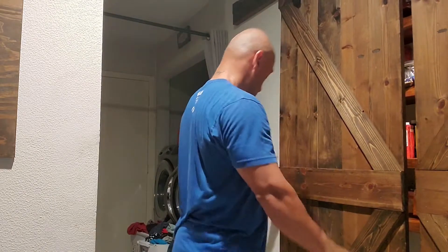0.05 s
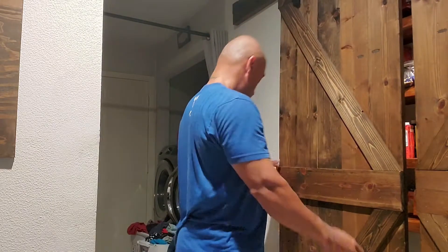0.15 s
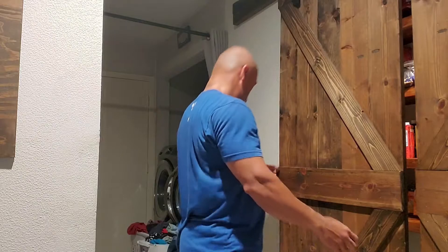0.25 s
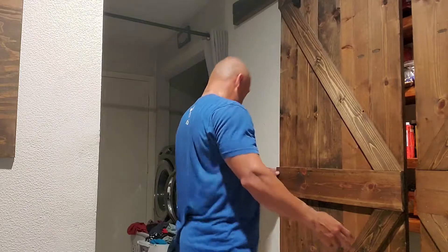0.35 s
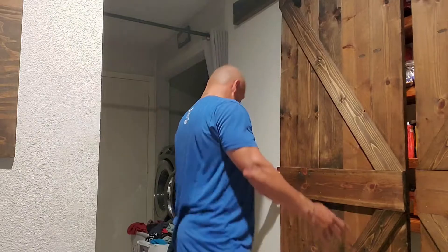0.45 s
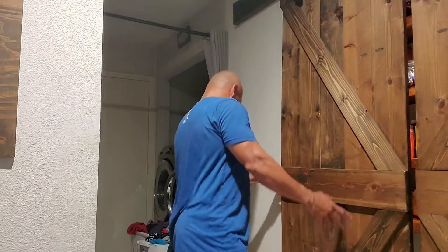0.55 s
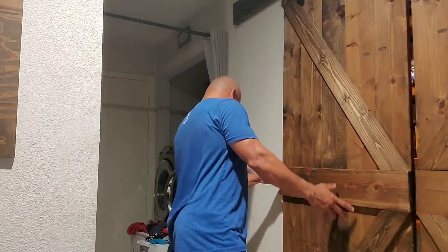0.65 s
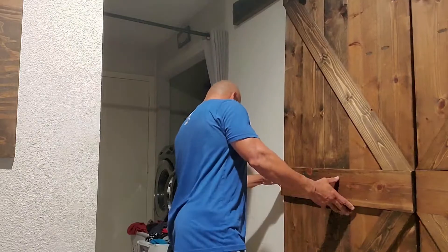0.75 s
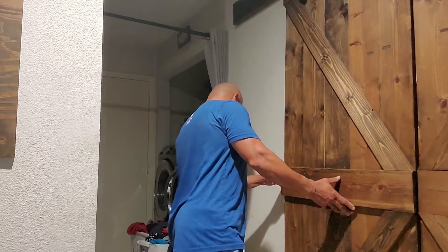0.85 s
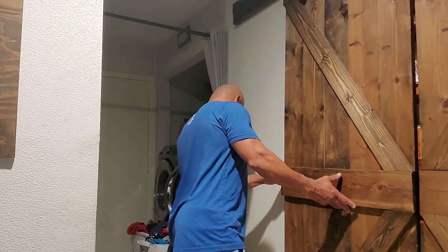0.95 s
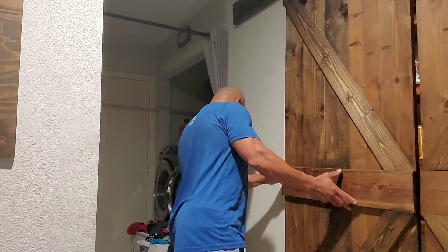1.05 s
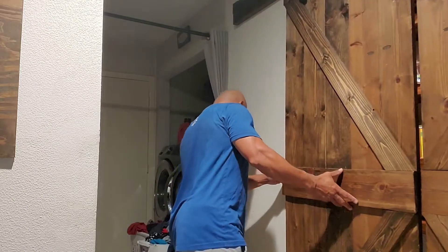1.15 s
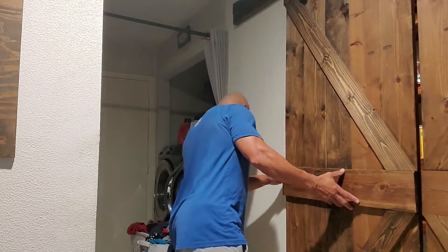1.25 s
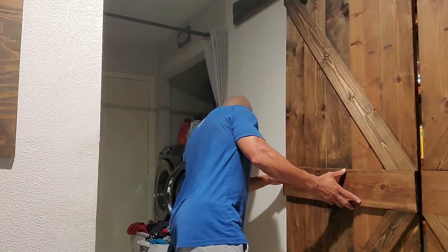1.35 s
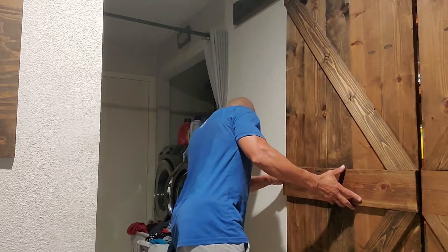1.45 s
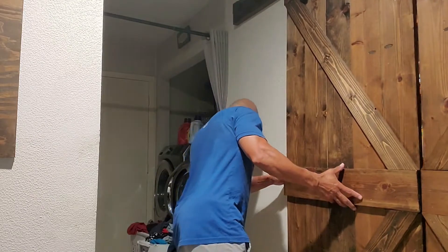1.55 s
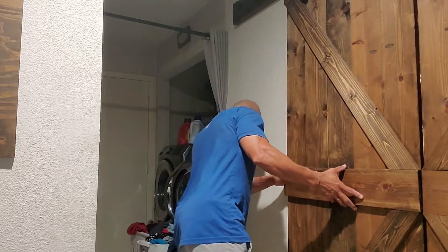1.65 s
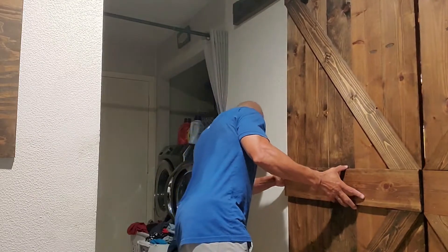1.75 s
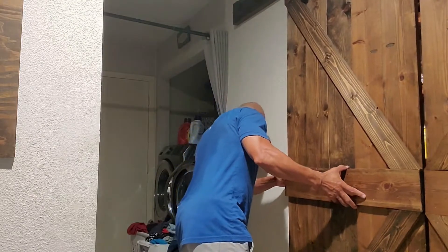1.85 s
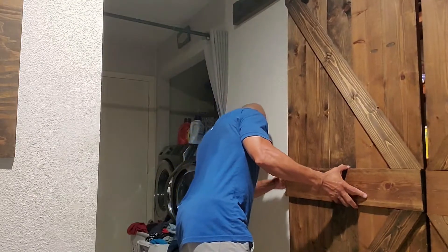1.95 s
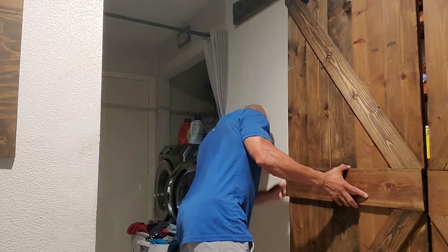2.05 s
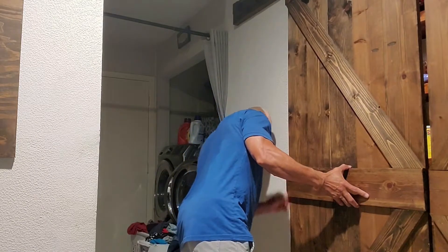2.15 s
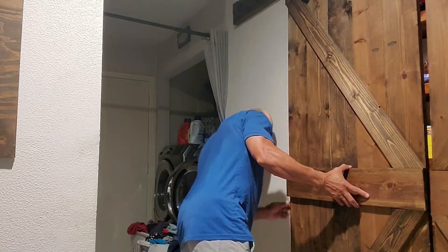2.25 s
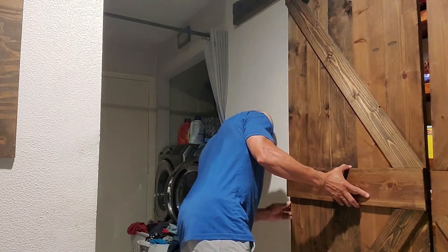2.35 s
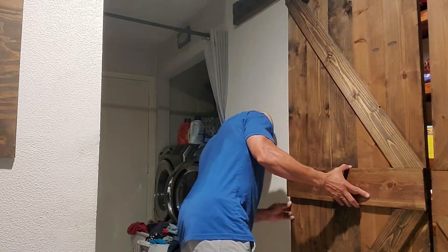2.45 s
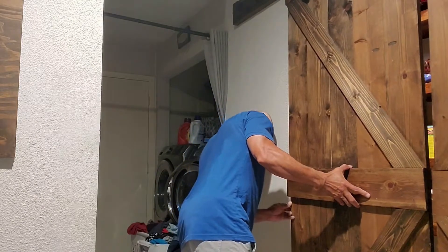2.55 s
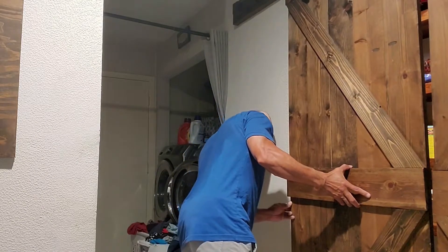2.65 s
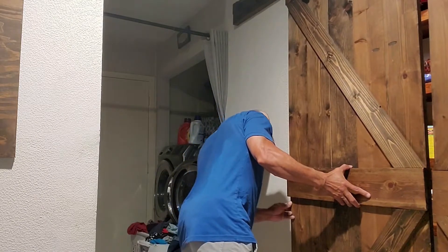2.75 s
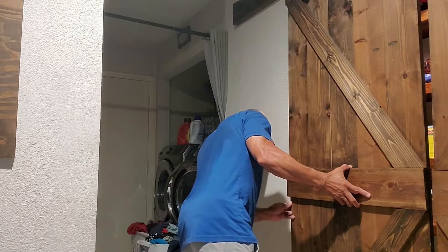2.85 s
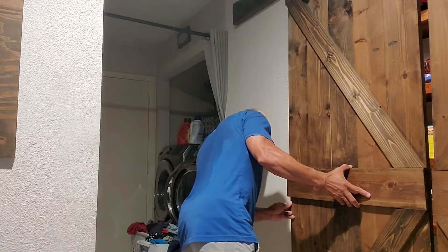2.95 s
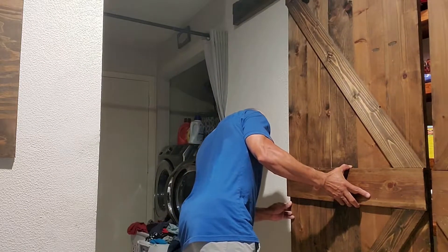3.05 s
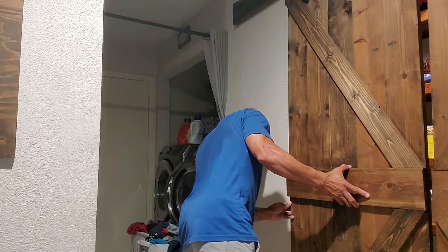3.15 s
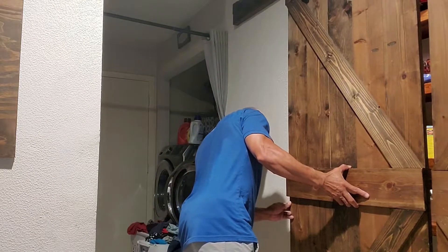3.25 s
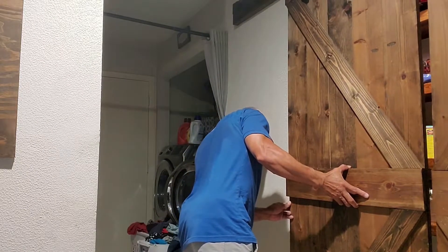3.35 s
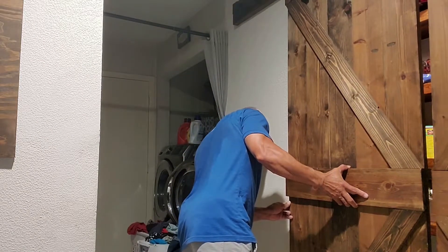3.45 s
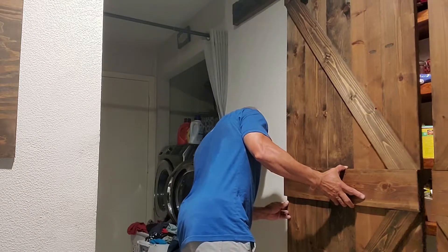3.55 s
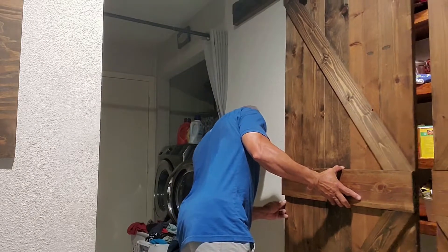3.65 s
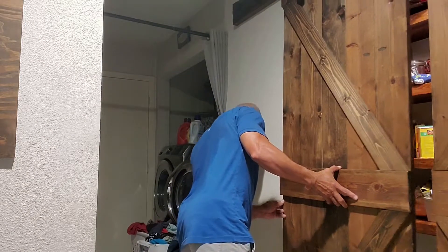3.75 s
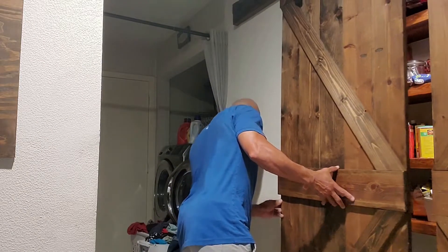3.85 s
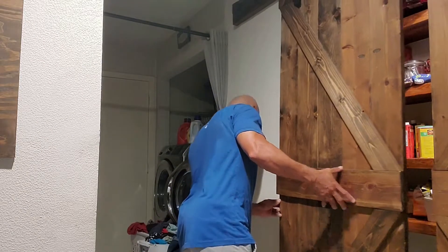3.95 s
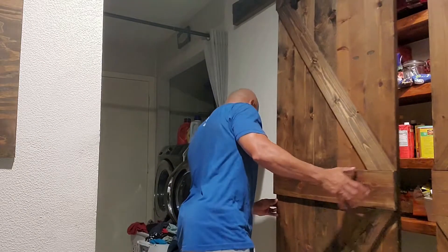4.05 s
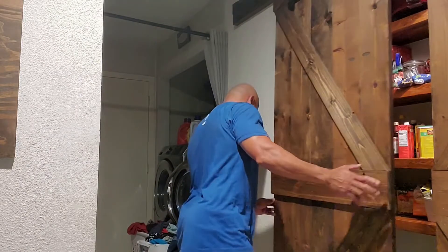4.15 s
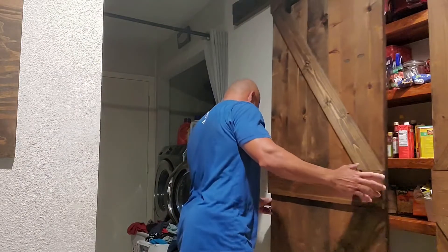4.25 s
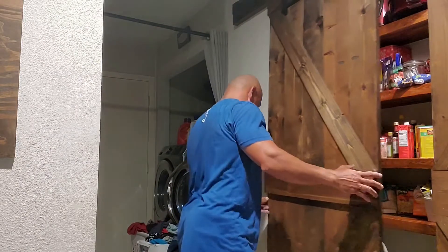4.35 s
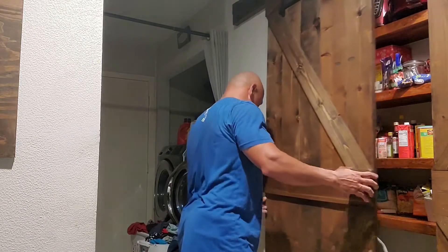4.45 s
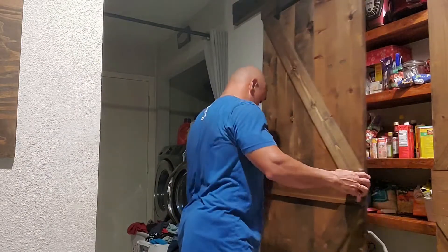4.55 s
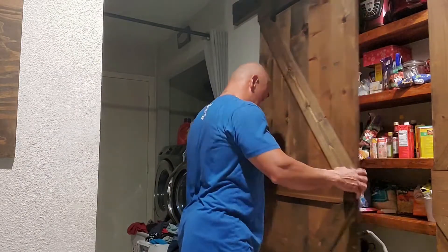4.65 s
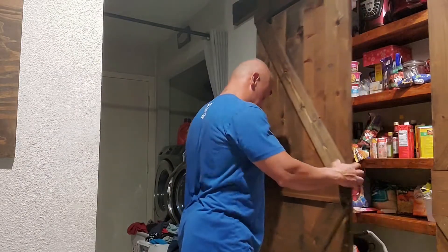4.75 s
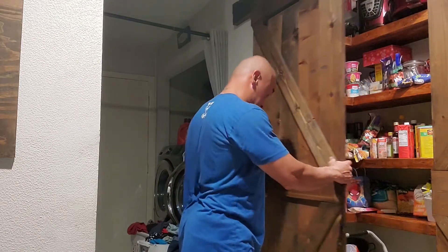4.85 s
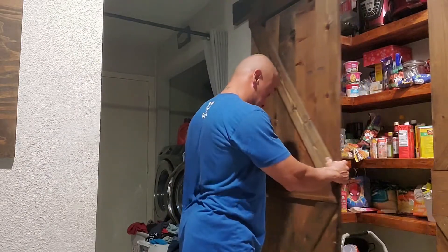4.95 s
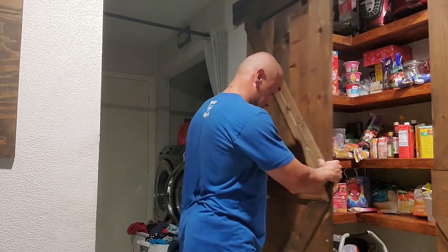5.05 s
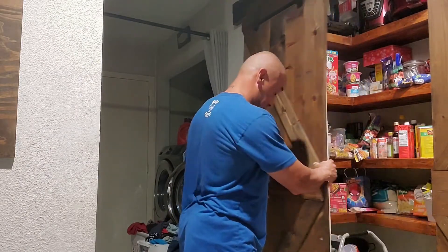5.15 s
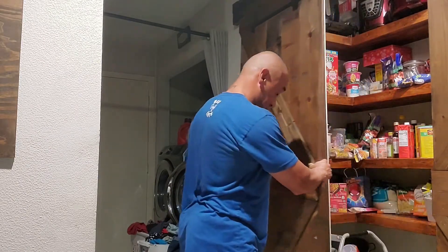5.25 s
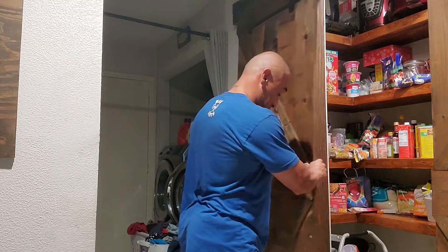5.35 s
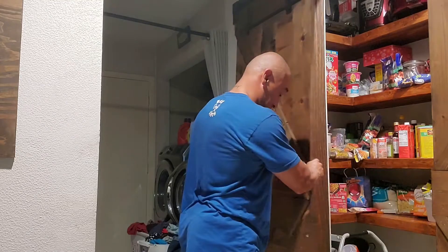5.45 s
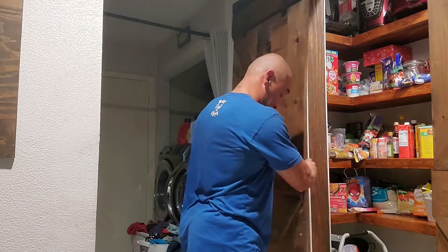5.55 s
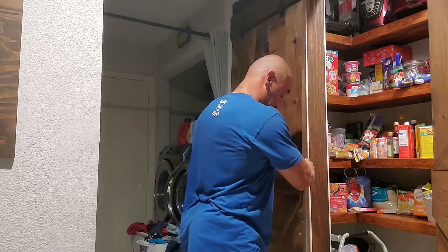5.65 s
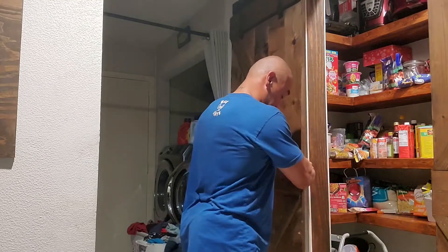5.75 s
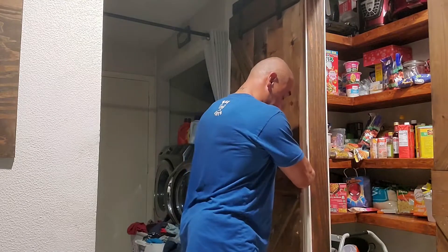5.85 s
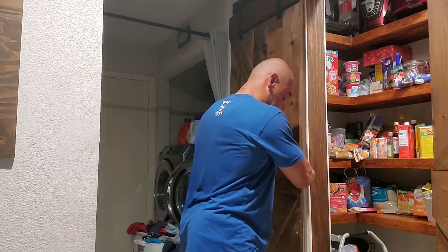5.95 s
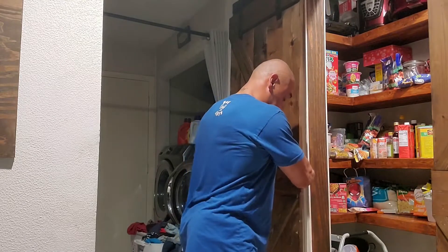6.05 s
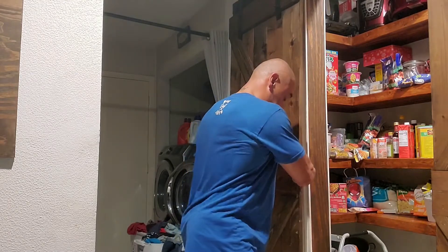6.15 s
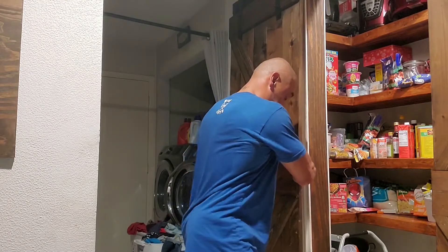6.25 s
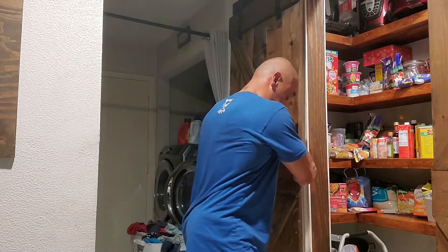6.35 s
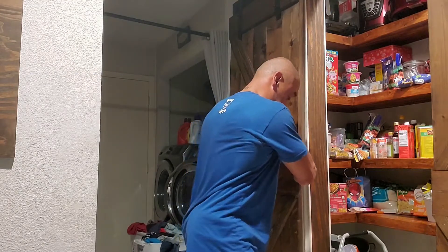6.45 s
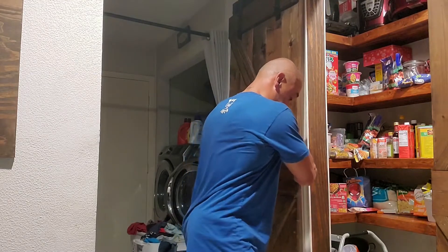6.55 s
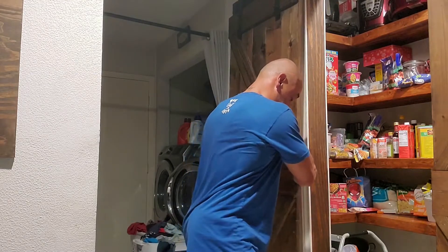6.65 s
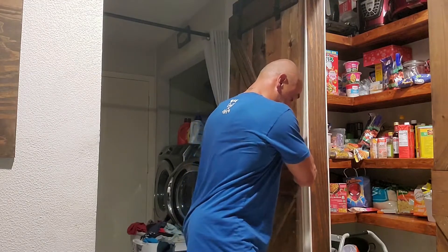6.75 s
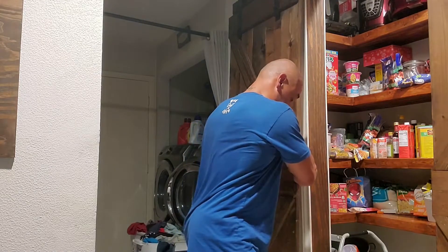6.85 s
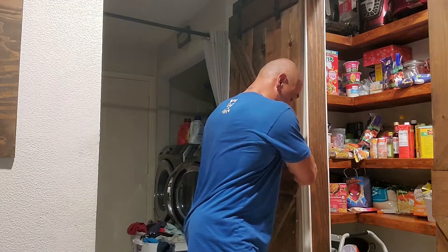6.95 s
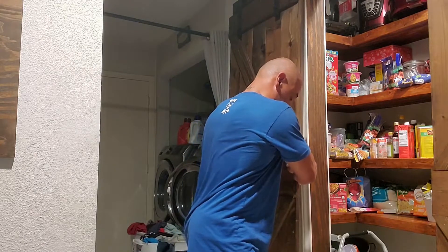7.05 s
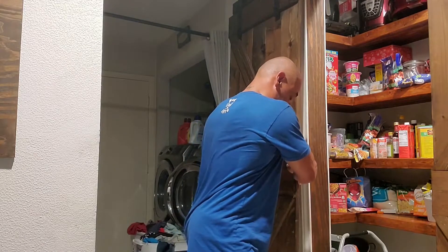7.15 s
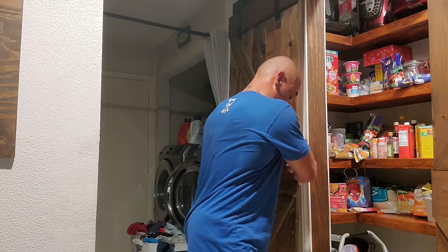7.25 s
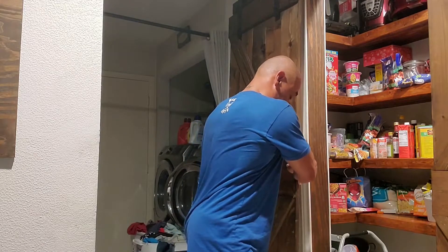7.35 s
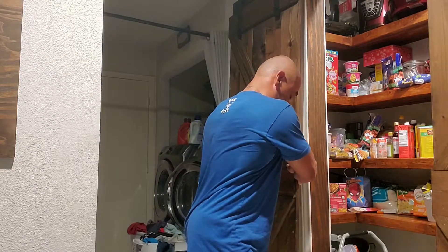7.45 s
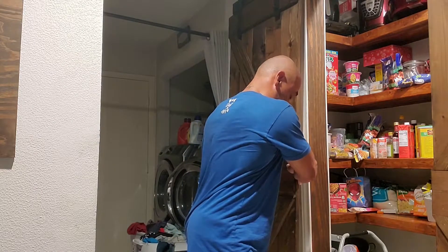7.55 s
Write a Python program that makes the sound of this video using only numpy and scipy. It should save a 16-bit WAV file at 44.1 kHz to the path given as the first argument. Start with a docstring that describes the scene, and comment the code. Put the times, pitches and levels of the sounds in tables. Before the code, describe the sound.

A heavy plank door knocks hard against wood, rattles on its metal hangers, then rumbles aside on an overhead rail in a quiet home.

```python
"""Quiet home: a heavy plank door hangs from steel wheels on an overhead rail.
A man knocks it against its neighbour, jolts it free and rolls it aside; a refrigerator drones nearby.
Knocks ring the modes of door, planks and hangers and crack at the contact; noise keeps the door rumbling.
Hands and shirt are filtered noise in swells; the refrigerator is resonated noise and thin tones.
Room air and microphone hiss are coloured noise."""
import sys
import numpy as np
from scipy import signal
from scipy.fft import rfft, irfft
from scipy.io import wavfile

SR = 44100
rng = np.random.default_rng(int(sys.argv[2]) if len(sys.argv) > 2 else 0)


def digitize_waveform(pressure):
    """Quantize a signal to 16-bit integers and store it at the path in sys.argv[1].

    Rows of a 2-D input are taken as channels; values are limited to [-1, 1].
    """
    field = np.atleast_2d(pressure).T
    bounded = np.clip(field, -1, 1)
    quanta = np.round(bounded * 32767).astype(np.int16)
    wavfile.write(sys.argv[1], SR, quanta)


N = 335160

# room air and microphone hiss, relative spectrum: hz, level_db_per_hz
BACKGROUND_SPECTRUM = [(22, -41), (49, 7), (100, -7.5), (200, -16.5), (400, -10), (490, -58), (1200, -24),
                       (1500, -31), (3500, -31.5), (3900, -39.5), (7000, -44.5), (8200, -46.5),
                       (9500, -56.5), (11500, -48.5), (15700, -48)]
# refrigerator resonances, relative: hz, width_hz, level_db
DRONE = [(66.3, 9.3, 19.5), (138, 12, -18), (198.4, 30, 7.5), (280.4, 3, -0.5), (368, 17, -12)]
# compressor tones, mean level: hz, level_db
WHINE = [(1640, -83), (1658, -83), (3247, -91), (3427, -90), (3607, -91)]
BACKGROUND_DB, DRONE_DB = -57, -60.5

# hands and cloth rubbing: start_s, rise_s, hold_s, hiss_db, scrape_db
RUBS = [(0, 0.0017, 0.0041, -65, -75), (0.112, 0.025, 0.0083, -68, -70), (.17, 0.017, 0.2, -67.5, -73),
        (0.26, 0.016, 0.11, -64.5, -86), (0.316, 0.083, 0.062, -62, -66.5),
        (0.552, 0.022, 0.0062, -68, -92), (0.7, 0.13, 0.021, -58.5, -71),
        (0.825, 0.0089, 0.039, -56.5, -40.5), (0.97, 0.069, 0.05, -65.5, -72),
        (1.325, 0.032, 0.0082, -65, -79), (1.42, 0.04, 0.096, -67.5, -85), (1.677, .006, 0.0062, -64, -52),
        (1.754, 0.039, 0.24, -85, -69.5), (1.996, 0.049, 0.092, -53, -56.5),
        (2.148, 0.015, 0.13, -50.5, -59.5), (3.718, 0.0084, 0.0052, -59.5, -51.5),
        (3.846, 0.011, 0.17, -66.5, -61.5), (4.108, 0.033, 0.086, -70, -65), (4.2, .04, 0.11, -87, -70.5),
        (4.353, 0.048, .03, -67.5, -67), (4.516, 0.051, 0.042, -66, -72), (4.71, .006, 0.0077, -70, -59),
        (4.808, 0.049, 0.082, -65.5, -69.5), (4.927, 0.049, 0.1, -69, -67),
        (5.047, 0.11, 0.091, -62.5, -69.5), (5.554, 0.052, 0.13, -56, -58), (5.73, 0.04, 0.14, -51, -50.5),
        (5.928, 0.042, 0.066, -58.5, -78), (6.27, 0.25, 0.092, -66.5, -73), (6.513, 0.11, 0.13, -62.5, -73)]
# cloth hiss, relative spectrum: hz, level_db_per_hz
HISS_SPECTRUM = [(1060, -37), (1800, -1), (2140, -4.5), (2380, -5), (4160, -2.5), (5750, -1.5),
                 (7680, -6.5), (8030, -11.5), (8550, -45), (9360, -39), (11900, -20), (15500, -34)]
# skin on wood, relative spectrum: hz, level_db_per_hz
SCRAPE_SPECTRUM = [(320, -65), (550, -18.5), (747, -1), (904, -5.5), (1080, -4), (1450, -10.5),
                   (2800, -18.5), (3640, -39.5), (6160, -120)]
# whistling of the fabric, relative: hz, width_hz, mean_level_db
WEAVE = [(3490, 190, -7.5), (4900, 87, -15), (5650, 80, -4), (6350, 210, -4)]
HISS_FADE_DB_PER_S, SCRAPE_FADE_DB_PER_S = 252, 233
REST_HISS_DB, REST_SCRAPE_DB = -76, -70.5

# knocks, levels before tilt, focus and spot: start_s, hangers_db, favoured_octaves (from 1010 Hz), planks_db,
# planks_tilt_db_per_octave, boom_db, crack_db, chatter_s (decay to 1/e, at least 1 ms)
KNOCKS = [(0.237, -62, -0.057, -62, 8, -48, -52.5, 0.0067), (0.287, -65, 0.2, -62, 7, -46, -66.5, 0.023),
          (0.578, -78.5, .5, -73, -3, -46, -59.5, 0.0055),
          (0.838, -30, -0.42, -19.5, 6.5, -32, -29.5, 0.0064),
          (0.883, -37.5, -0.44, -21.5, -5.5, -32.5, -56.5, 0.0047),
          (0.925, -53, -0.23, -28, -4, -20, -68, 0.012), (1.011, -51, -0.25, -41, -10, -34, -79, 0.015),
          (1.692, -43, -0.59, -34, -11.5, -30, -46.5, .009), (1.844, -64, -.2, -44, -13, -36.5, -63, 0.027),
          (1.895, -49, -0.31, -43.5, 7, -45, -52, 0.0175), (2.03, -49.5, 0.47, -65, 1, -34.5, -50.5, 0.068),
          (2.095, -41, 0.36, -55, -1, -41, -37.5, .006), (2.169, -41, 0.46, -51, 5, -39, -45.5, 0.027),
          (2.249, -49.5, 0.31, -60, -2, -66, -43, .04), (2.453, -58, 0.032, -50, -7, -48, -78, 0.004),
          (2.667, -62.5, 0.49, -60, -10, -54, -56.5, 0.011),
          (3.726, -36, -0.24, -26.5, 0, -36.5, -50, 0.0088), (3.783, -39, .1, -34.5, 2, -33, -72, .008),
          (3.866, -45.5, -0.17, -34, -5, -27, -71, 0.008), (3.908, -34, 0.16, -43, -5, -31, -62, 0.0091),
          (3.964, -52, 0.054, -33.5, -7.5, -43, -72, 0.013),
          (4.024, -45, -0.033, -49.5, -1, -35, -58, 0.012), (4.123, -44.5, 0.14, -40.5, 5, -35, -47, .006),
          (4.17, -68, -0.092, -37.5, -1.5, -37, -69, 0.02), (4.281, -48, -0.43, -44, -10, -29, -70, 0.013),
          (4.317, -52, -0.091, -46, -11, -48, -64, 0.027),
          (4.374, -55, -0.33, -38.5, -2.5, -39.5, -63.5, 0.006),
          (4.414, -48.5, -0.52, -41, 0.5, -44, -63, 0.0041), (4.716, -60.5, 0.35, -62, 8, -75, -46, 0.0079),
          (5.595, -42, 0.079, -44.5, 8, -45, -46, .008), (5.744, -43.5, 0.31, -57, 19, -50, -52, .014),
          (5.813, -40, 0.29, -29.5, 3.5, -26, -38.5, 0.014),
          (5.881, -48, 0.28, -33, -14.5, -32, -55, 0.016)]
# whole-door modes as struck: hz, level_db, t60_s
BOOM_MODES = [(41.2, 0, 0.25), (56, -4.5, 0.41), (75.2, -10.5, 0.23), (109, -13, 0.58),
              (141.4, -12.5, 0.21)]
# plank modes as struck: hz, level_db, t60_s
PLANK_MODES = [(173.6, -9, 0.11), (204.4, 1, 0.091), (239, -7.5, 0.15), (279.1, 1, 0.15), (305, -5, 0.053),
               (367.1, -4.5, 0.12), (414, -6.5, 0.087), (476, -7, 0.067), (570.8, -8.5, 0.07),
               (670, -9.5, 0.045)]
# steel hanger modes as struck: hz, level_db, t60_s
HANGER_MODES = [(741, -5.5, 0.081), (798, -2.5, 0.24), (846.4, 2, 0.079), (950, -1, 0.04),
                (1044, 2.5, 0.076), (1110, -4, 0.078), (1175, -5.5, 0.1), (1273, 7.5, 0.032),
                (1390, -15, 0.062), (1458, -9.5, 0.13), (1785, 1, 0.038), (1980, -4.5, 0.055),
                (2200, -5.5, 0.054), (2747, -7.5, 0.06)]
# contact crack, relative spectrum: hz, level_db_per_hz
CRACK_SPECTRUM = [(1500, -5.5), (2500, -4.5), (3800, 0.5), (5000, 2), (6500, 1), (7700, -11), (8300, -44.5),
                  (9300, -60), (12000, -34.5), (15600, -28.5)]
CRACK_S = 0.0012  # a crack's energy is that of its level held this long
SPOT_DB = 3  # spread of each mode's strength with where a knock lands
BOOM_TILT_DB_PER_OCTAVE, BOOM_MIDDLE_HZ, PLANK_MIDDLE_HZ = 7.5, 70, 320
# hanger loss away from the favoured pitch: square law, limited
FOCUS_DB_PER_OCTAVE_SQUARED, FOCUS_DEPTH_DB = 32.5, 17.5

# shoves that leave the door shaking: start_s, hold_s, fade_db_per_s (swing, boom), swing_db, boom_db, planks_db
SHOVES = [(0.287, 0.04, 140, -36.5, -55, -93), (0.854, 0.082, 36.5, -33.5, -29.5, -36.5),
          (1.685, 0.046, 69, -30, -31, -42), (1.763, 0.21, 56, -44, -38, -50.5),
          (1.974, 0.17, 124, -37.5, -62.5, -64), (2.433, 0.054, 68, -40, -53, -79),
          (5.804, 0.056, 83, -34.5, -31.5, -32), (6.008, 0.022, 53, -42.5, -54, -76.5)]
# door rolling aside: time_s, swing_db, boom_db, planks_db
ROLL = [(3.3, -73, -74, -57), (3.7, -55, -56, -55.5), (3.77, -31.5, -37, -37.5), (3.95, -31, -30.5, -42),
        (4.21, -30, -40.5, -41.5), (4.3, -39.5, -47, -42.5), (4.49, -34.5, -57, -44),
        (4.62, -38.5, -43.5, -52), (4.9, -42.5, -50, -53), (5.3, -46, -54, -53.5), (5.7, -45, -49.5, -53.5),
        (6.2, -61, -62, -60.5), (6.4, -79, -59.5, -63.5)]
SWING_RISE_S, SHAKE_RISE_S = 0.03, 0.01  # the slow swing builds later than the rattle
PLANK_FADE_DB_PER_S = 420
REST_SWING_DB, REST_BOOM_DB, REST_PLANKS_DB = -83, -70, -62.5

# left-right likeness: hz, correlation
LIKENESS = [(30, 0.98), (90, 1), (180, 0.95), (350, 0.89), (700, 0.28), (1400, 0.12), (2800, 0.37),
            (8000, 0.0)]
# left minus right: hz, level_db
LEAN = [(100, 0.2), (350, -0.1), (1000, -0.5), (4000, 0.1), (9000, -1), (13000, -1.5)]
# room decay: hz, t60_s
ROOM_T60 = [(60, 0.23), (300, 0.44), (1500, 0.11), (4000, 0.32), (8000, 0.094)]
# reflections against direct sound: hz, level_db
ROOM_WET = [(60, -13.5), (250, -1.5), (700, -0.5), (1100, -1.5), (2000, 4.5), (8000, -8.5)]
LEFT_LEAD_S = 0.00008
LOW_CUT_HZ, CUTOFF_HZ = 31, 15680


def from_db(db):
    """Decibels to gain."""
    return 10 ** (np.asarray(db) / 20)


def rms_one(x):
    """Scale to unit rms."""
    return x / np.sqrt(np.mean(x ** 2) + 1e-20)


def in_time(rows):
    """Columns of a curve table at every sample."""
    time_s, *columns = np.transpose(rows)
    return [np.interp(np.arange(N) / SR, time_s, column) for column in columns]


def at_hz(points, hz):
    """Read a table on a log-frequency axis."""
    table_hz, values = np.transpose(points)
    return np.interp(np.log(hz), np.log(table_hz), values)


def drift(rate_hz):
    """Slow random wander, unit rms: low-passed noise computed at SR / 40."""
    pole = np.exp(-80 * np.pi * rate_hz / SR)
    noise = rng.standard_normal(N // 40 + 2002)
    slow = signal.lfilter([1], [1, -2 * pole, pole * pole], noise)[2000:]  # settled part
    return np.interp(np.arange(N) / 40, np.arange(len(slow)), rms_one(slow))


def band(x, low_hz, high_hz):
    """Keep the range in which a body radiates."""
    return signal.sosfilt(signal.butter(2, [low_hz, high_hz], "band", fs=SR, output="sos"), x)


def ring(force, hz, t60_s):
    """One mode: a unit click sets a decaying sine of initial height 1 ringing."""
    radius, angle = from_db(-60 / (t60_s * SR)), 2 * np.pi * hz / SR
    feedback = [1, -2 * radius * np.cos(angle), radius * radius]
    return signal.lfilter([0, np.sin(angle)], feedback, force + 1e-18)


def resonate(noise, hz, width_hz):
    """Noise through a resonance of given bandwidth; unit rms."""
    return rms_one(ring(noise, hz, np.log(1000) / (np.pi * width_hz)))


def colour(x, spectrum):
    """Impose a spectrum, steeply closed outside its ends; unit rms."""
    hz = np.maximum(np.fft.rfftfreq(N, 1 / SR), 1)
    low_hz, high_hz = spectrum[0][0], spectrum[-1][0]
    skirt = np.minimum(1, hz / low_hz) ** 4 * np.minimum(1, high_hz / hz) ** 4
    return rms_one(irfft(rfft(x) * from_db(at_hz(spectrum, hz)) * skirt, N))


def pair(mid, side):
    """Two close microphone ports: alike in the bass, unrelated in the treble, the left a little early."""
    size = mid.shape[-1]
    hz = np.maximum(np.fft.rfftfreq(size, 1 / SR), 1)
    alike = np.clip(at_hz(LIKENESS, hz), -1, 1)
    lean = from_db(at_hz(LEAN, hz) / 2) * np.exp(1j * np.pi * hz * LEFT_LEAD_S)
    common = rfft(mid) * np.sqrt((1 + alike) / 2)
    opposed = rfft(side) * np.sqrt((1 - alike) / 2)
    return irfft(np.array([(common + opposed) * lean, (common - opposed) / lean]), size)


def swells(starts_s, rises_s, holds_s, levels_db, fades_db_per_s):
    """Gain of events that rise, hold and fade exponentially; their powers add."""
    power = np.zeros(N)
    events = np.broadcast(starts_s, rises_s, holds_s, levels_db, fades_db_per_s)
    for start_s, rise_s, hold_s, level_db, fade in events:
        t = np.arange(max(round(start_s * SR), 0), N) / SR - start_s
        rise = np.clip(t / max(rise_s, 0.001), 0, 1) ** 2
        fall = from_db(level_db - fade * np.maximum(t - rise_s - hold_s, 0))
        power[N - len(t):] += (rise * fall) ** 2
    return np.sqrt(power)


def house():
    """Room air and microphone hiss as coloured noise, refrigerator drone as resonated noise, whine as wavering sines."""
    background = from_db(BACKGROUND_DB) * colour(rng.standard_normal((2, N)), BACKGROUND_SPECTRUM)
    noise = rng.standard_normal((2, N))
    drone = sum(from_db(db) * resonate(noise, hz, width_hz) for hz, width_hz, db in DRONE)
    t = np.arange(N) / SR
    whine = 0
    for hz, db in WHINE:
        phase = rng.random((2, 1))  # cycles, per channel
        whine = whine + from_db(db + 3 * drift(2.5)) * np.sin(2 * np.pi * (hz * t + phase))
    return pair(*(background + from_db(DRONE_DB) * rms_one(drone))) + whine


def rustle():
    """Skin and fabric slide in dense tiny slips; rubbing the door also stirs the hangers."""
    start_s, rise_s, hold_s, hiss_db, scrape_db = np.transpose(RUBS)
    slips = rng.standard_normal((4, N)) * from_db(1.07 * drift(24) + 0.39 * drift(150))
    cloth, skin = slips[:2], slips[2:]
    whistles = sum(from_db(db + 3.0 * drift(8.2)) * resonate(skin, hz, width_hz) for hz, width_hz, db in WEAVE)
    hiss = colour(cloth, HISS_SPECTRUM) + from_db(-8.0) * rms_one(whistles)
    # rubbed hangers ring three times longer than struck ones
    stirred = sum(from_db(db) * rms_one(ring(cloth, hz, 3.0 * t60_s)) for hz, db, t60_s in HANGER_MODES)
    scrape = colour(skin, SCRAPE_SPECTRUM) + from_db(-5.5) * rms_one(stirred)
    hiss_gain = swells(start_s, rise_s, hold_s, hiss_db, HISS_FADE_DB_PER_S) + from_db(REST_HISS_DB)
    scrape_gain = swells(start_s, rise_s, hold_s, scrape_db, SCRAPE_FADE_DB_PER_S) + from_db(REST_SCRAPE_DB)
    return hiss_gain * pair(*hiss) + scrape_gain * pair(*scrape)


def contacts(touches_per_s, first):
    """Each knock is a first touch followed by a dying chatter of smaller ones; unit energy."""
    when, size = rng.random((2, len(KNOCKS), 4096))
    chatter_s = np.maximum(np.array(KNOCKS)[:, -1:], 0.001)
    decay = np.exp(-np.arange(4096) / SR / chatter_s)
    chatter = (when < touches_per_s / SR) * (2 * size - 1) * decay
    chatter[:, 0] = first
    return chatter / np.sqrt(np.sum(chatter ** 2, axis=1, keepdims=True))


def blows(chatter, levels_db):
    """Lay the contacts out in time as one force."""
    force = np.zeros(N)
    for row, touches, level_db in zip(KNOCKS, chatter, levels_db):
        i = round(row[0] * SR)
        force[i:i + len(touches)] += from_db(level_db) * touches
    return force


def struck(modes, chatter, levels_db, favour_db):
    """The modes of one body; each knock has its strength and favours some of them."""
    out = 0
    spot_db = SPOT_DB * rng.standard_normal((len(KNOCKS), len(modes)))
    for k, (hz, db, t60_s) in enumerate(modes):
        force = blows(chatter, db + levels_db + favour_db(hz) + spot_db[:, k])
        out = out + (-1) ** k * ring(force, hz, t60_s)  # neighbours in antiphase
    return out


def knocks():
    """Boom, planks and hangers ring; the contact itself cracks."""
    _, hangers_db, octaves, planks_db, tilt, boom_db, crack_db, _ = np.transpose(KNOCKS)

    def boom_favour_db(hz):
        return BOOM_TILT_DB_PER_OCTAVE * np.log2(hz / BOOM_MIDDLE_HZ)

    def plank_favour_db(hz):
        return tilt * np.log2(hz / PLANK_MIDDLE_HZ)

    def hanger_favour_db(hz):
        away_octaves = np.log2(hz * 0.00099) - octaves
        return -np.minimum(FOCUS_DB_PER_OCTAVE_SQUARED * away_octaves ** 2, FOCUS_DEPTH_DB)

    boom = struck(BOOM_MODES, contacts(60, 0.9), boom_db, boom_favour_db)
    planks = struck(PLANK_MODES, contacts(400, 1.07), planks_db, plank_favour_db)
    hangers = struck(HANGER_MODES, contacts(780, 0.97), hangers_db, hanger_favour_db)
    force = blows(contacts(3000, 0.71), crack_db)
    crack = colour(force, CRACK_SPECTRUM) * np.sqrt(np.mean(force ** 2) * CRACK_S * SR)
    return band(boom, 48, 260) + band(planks, 130, 980) + band(hangers, 650, 5500) + crack


def room(x):
    """Direct sound, then dense reflections that die band by band."""
    t = np.arange(SR) / SR
    edges_hz = 30 * 2 ** np.arange(0, 9.5, 0.5)
    tail = 0
    for low_hz, high_hz in zip(edges_hz, edges_hz[1:]):
        noise = band(rng.standard_normal((2, SR)), low_hz, high_hz)
        t60_s = at_hz(ROOM_T60, low_hz)
        decay = from_db(at_hz(ROOM_WET, low_hz) - 60 * t / t60_s)
        tail = tail + noise * decay * np.sqrt(6 * np.log(10) / (t60_s * SR))  # decay energy set by ROOM_WET
    response = pair(*(tail * np.minimum(t / 0.0028, 1)))  # reflections build up over 2.8 ms
    response[0, 0] += 1
    response[1, round(LEFT_LEAD_S * SR)] += 1
    return signal.fftconvolve(x[None], response, axes=1)[:, :N]


def rumble():
    """Bumps under the wheels and swinging keep the door's low modes sounding."""
    start_s, hold_s, fade, swing_db, boom_db, planks_db = np.transpose(SHOVES)
    roll_swing, roll_boom, roll_planks = from_db(in_time(ROLL))
    swing_gain = swells(start_s, SWING_RISE_S, hold_s, swing_db, fade) + roll_swing + from_db(REST_SWING_DB)
    boom_gain = swells(start_s, SHAKE_RISE_S, hold_s, boom_db, fade) + roll_boom + from_db(REST_BOOM_DB)
    plank_gain = swells(start_s, SHAKE_RISE_S, hold_s, planks_db, PLANK_FADE_DB_PER_S)
    plank_gain = plank_gain + roll_planks + from_db(REST_PLANKS_DB)
    bumps = rng.standard_normal((2, 2, N)) * from_db(2.2 * drift(14))
    # modes die sooner here than when struck
    boom = [from_db(db) * rms_one(ring(bumps[0], hz, 0.73 * t60_s)) for hz, db, t60_s in BOOM_MODES]
    planks = sum(from_db(db) * rms_one(ring(bumps[1], hz, 0.91 * t60_s)) for hz, db, t60_s in PLANK_MODES)
    swing = pair(*rms_one(band(sum(boom[:2]), 32, 164)))  # two lowest modes
    upper_boom = pair(*rms_one(band(sum(boom[2:]), 32, 164)))
    shaken_planks = pair(*rms_one(band(planks, 110, 460)))
    return swing_gain * swing + boom_gain * upper_boom + plank_gain * shaken_planks


def scene():
    """Background, refrigerator and rustle, knocks through the room, rumble of the door."""
    return house() + rustle() + room(knocks()) + rumble()


def record(dry):
    """The deepest bass is rolled off, the top is cut."""
    firm = signal.sosfilt(signal.butter(4, LOW_CUT_HZ, "high", fs=SR, output="sos"), dry)
    return signal.sosfilt(signal.ellip(12, 0.5, 70, CUTOFF_HZ, fs=SR, output="sos"), firm)


dry = scene()
out = record(dry)
digitize_waveform(out)
```